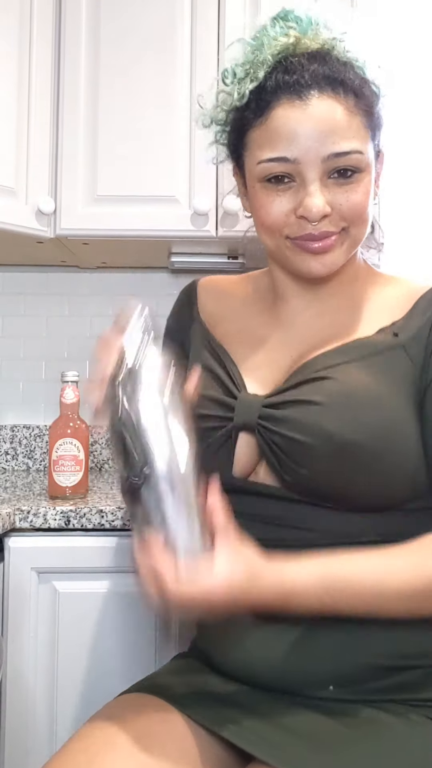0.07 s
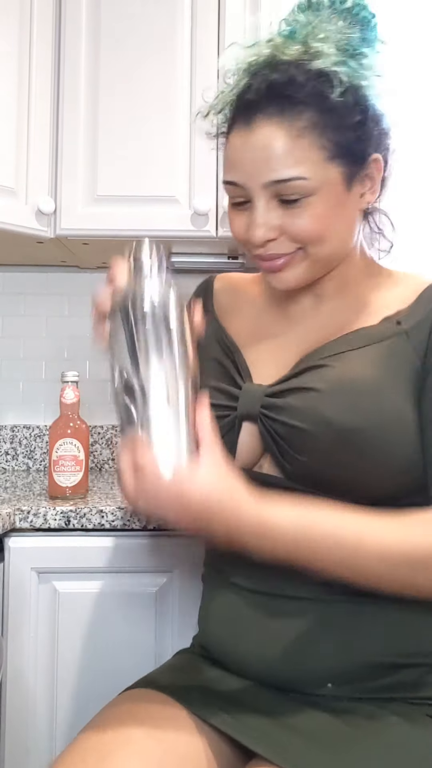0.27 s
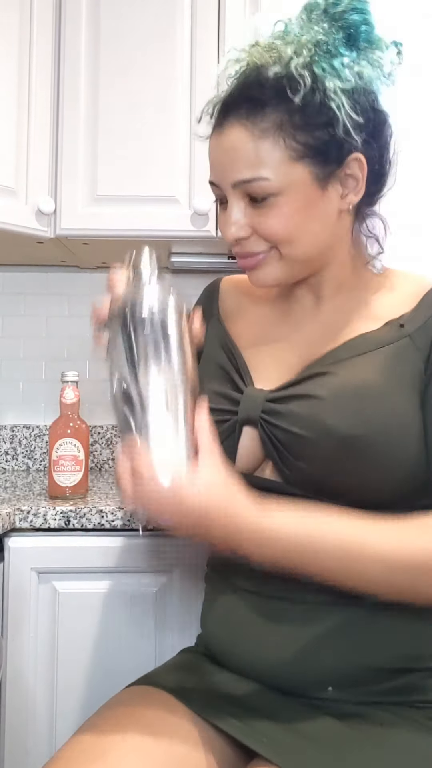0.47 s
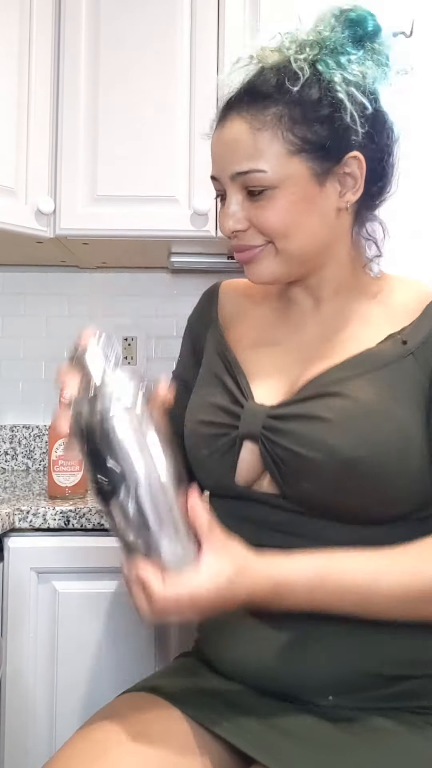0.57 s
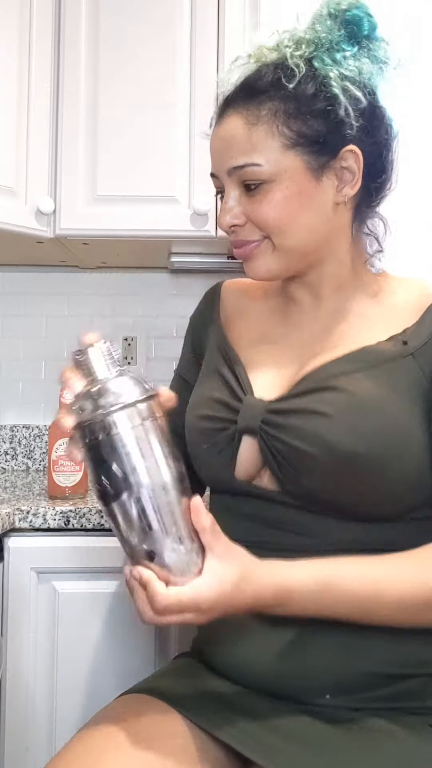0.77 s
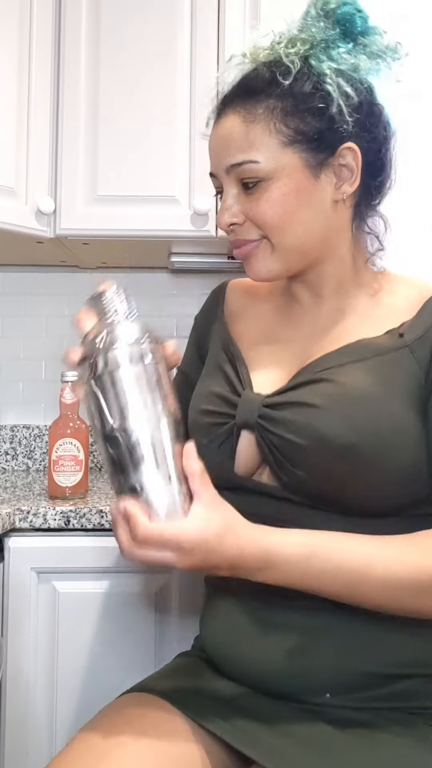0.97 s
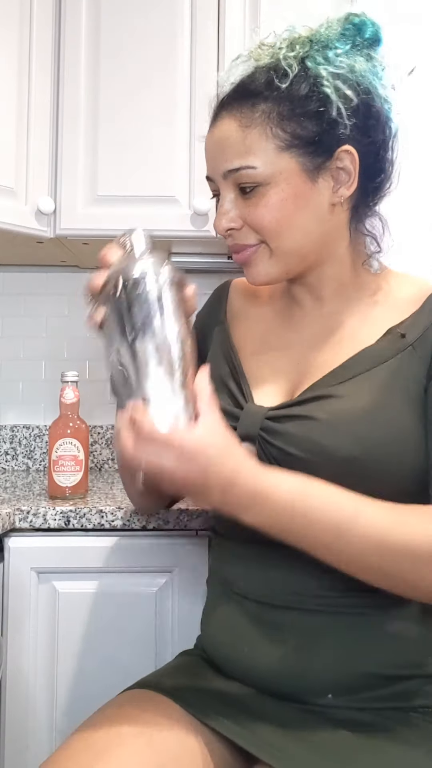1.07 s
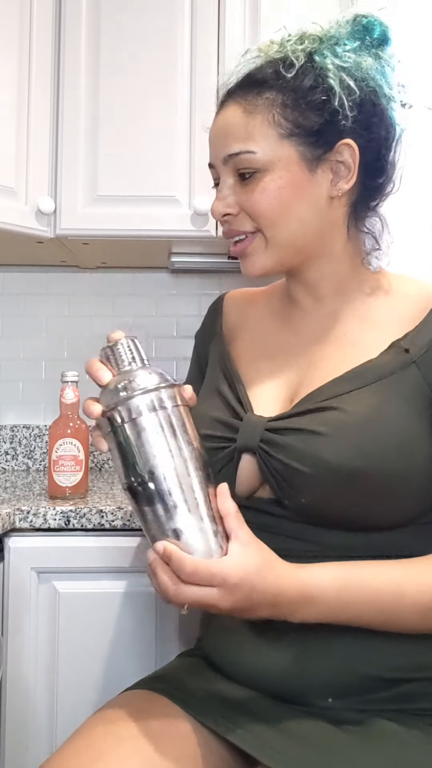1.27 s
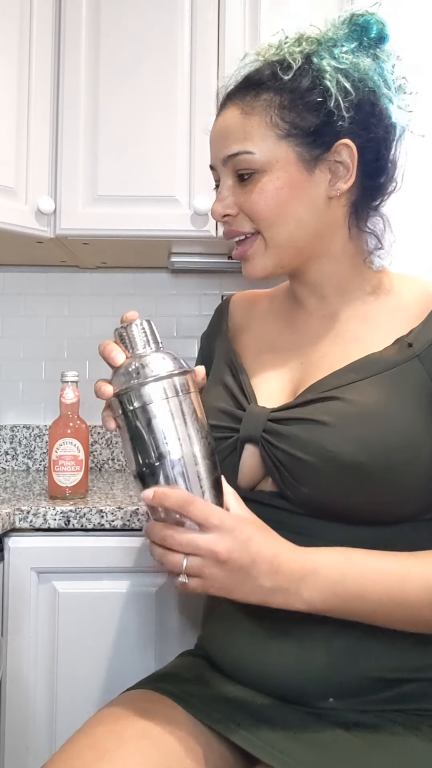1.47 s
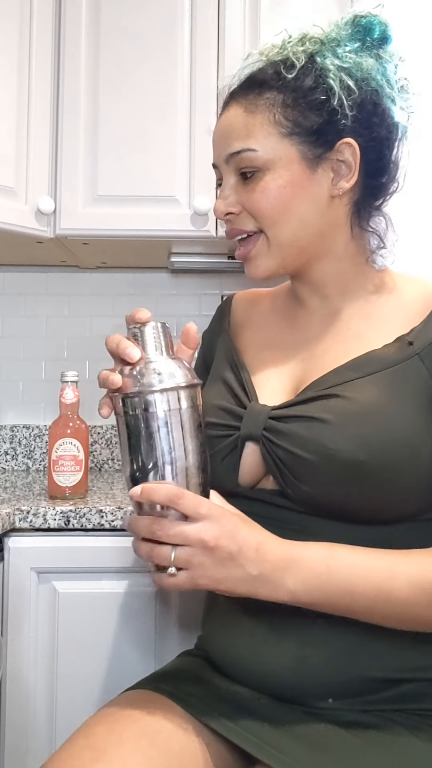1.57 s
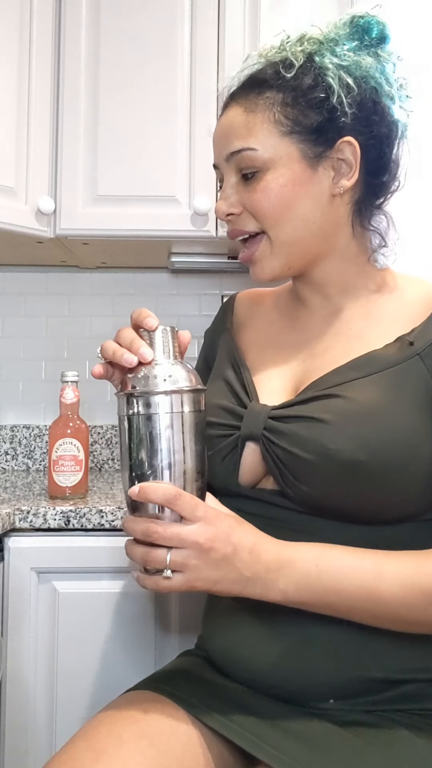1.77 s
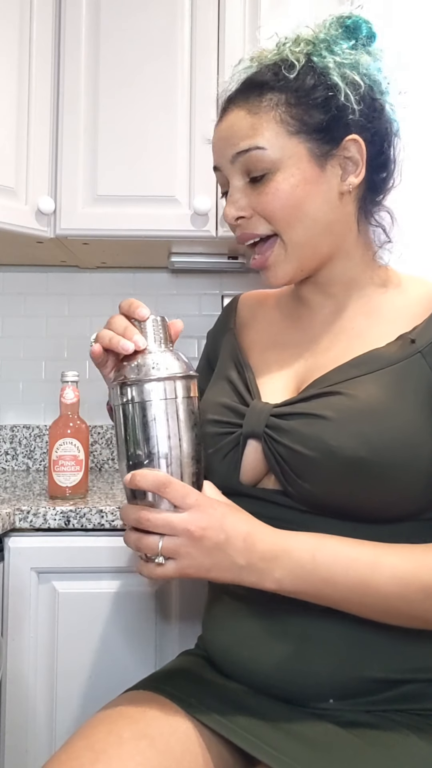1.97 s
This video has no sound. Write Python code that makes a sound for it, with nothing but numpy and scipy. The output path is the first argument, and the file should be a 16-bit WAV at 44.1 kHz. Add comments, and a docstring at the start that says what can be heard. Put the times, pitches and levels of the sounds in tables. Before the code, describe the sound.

Ice crashes end to end in a hand-held steel cocktail shaker, quick and even, with liquid sloshing; after about a second and a half it stops, and a few cubes clink faintly. Close stereo microphone, hard-walled kitchen.

```python
"""A hard-walled kitchen: ice cubes crash from end to end of a hand-held steel shaker, in stereo.
Crashes overlap for a second and a half; then the shaking stops, the room dies away, a few cubes settle.
Each crash is a spray of random clicks that rings the damped shell modes and drives broad clatter;
bursts of noise make the bright crackle, low noise the slosh of the drink. Lone knocks ring the modes.
Soft thumps of the load, noise-tail echoes, room air and a lumpy rumble lie below."""
import sys
import numpy as np
from scipy import signal
from scipy.fft import rfft, irfft
from scipy.io import wavfile

SR = 44100
rng = np.random.default_rng(int(sys.argv[2]) if len(sys.argv) > 2 else 0)


def volts(x):
    """Linear amplitude factor 10**(x/20) for a level x in dB, scalar or array-like."""
    e = np.asarray(x, float) / 20
    return 10 ** e


def bounce(signal):
    """Save signal as a 16-bit WAV file at the path given by the first command-line argument."""
    frames = np.transpose(np.atleast_2d(signal))
    limited = np.clip(frames, -1, 1)
    pcm = np.round(limited * 32767).astype(np.int16)
    wavfile.write(sys.argv[1], SR, pcm)


N = 89170


def rms_one(x):
    """Scale to rms 1."""
    return x / np.sqrt(np.mean(x ** 2) + 1e-20)


def at_hz(points, hz):
    """Read a table on a log-frequency axis."""
    table_hz, values = np.transpose(points)
    return np.interp(np.log(hz + 1), np.log(table_hz + 1), values)


def colour(x, spectrum):
    """Minimum-phase (causal) filter with this spectrum, power gain 1."""
    size = 4096
    level_db = np.maximum(at_hz(spectrum, np.fft.rfftfreq(size, 1 / SR)), -90)
    cepstrum = irfft(np.log(volts(level_db)))
    cepstrum[1:size // 2] *= 2  # fold onto positive time
    cepstrum[size // 2 + 1:] = 0
    pulse = irfft(np.exp(rfft(cepstrum)))
    pulse = pulse / np.sqrt(np.sum(pulse ** 2))
    return signal.fftconvolve(x, [pulse], axes=1)[:, :N]


def band_pass(x, low_hz, high_hz):
    """Butterworth band."""
    sos = signal.butter(2, [low_hz, high_hz], "band", fs=SR, output="sos")
    return signal.sosfilt(sos, x)


def ring(clicks, hz, t60_s):
    """Two-pole resonator: a unit click starts a decaying sine of height 1."""
    r, w = volts(-60 / (t60_s * SR)), 2 * np.pi * hz / SR
    return signal.lfilter([0, np.sin(w)], [1, -2 * r * np.cos(w), r * r], clicks + 1e-18)


def dying(clicks, t60_s):
    """Each click leaves a tail that falls 60 dB in t60_s."""
    return signal.lfilter([1], [1, -volts(-60 / (t60_s * SR))], clicks + 1e-18)


def drift(rate_hz):
    """Slow random wander, rms 1: noise through a double pole at rate_hz."""
    r = np.exp(-2 * np.pi * rate_hz / SR)
    wander = signal.lfilter([1], [1, -2 * r, r * r], rng.standard_normal(N + SR))
    return rms_one(wander[SR:])


def swell(start_s, rise_s, hold_s, level_db, release_db_per_s):
    """Power of one event: linear amplitude rise, hold, steady fall in dB."""
    t, rise_s = np.arange(N) / SR, max(rise_s, 1 / 1000)
    rise = np.clip((t - start_s) / rise_s, 0, 1)
    fall_db = release_db_per_s * np.maximum(t - start_s - rise_s - hold_s, 0)
    return (rise * volts(level_db - fall_db)) ** 2


def collisions(per_s, spread_db):
    """Random clicks at times shared by two channels, with uneven size and sign drawn for each; rms 1."""
    happens = rng.random(N) < per_s / SR
    sizes = happens * volts(spread_db * np.minimum(rng.exponential(1, N), 4))
    return rms_one(sizes * rng.standard_normal((2, N)))


# quiet of the room: [f/Hz, relative level/dB]
AIR_SPECTRUM = [(35, -38), (60, 8.5), (176, -5), (300, -14.5), (839, -5.5), (1060, -16), (1900, -15),
                (2240, -19.5), (15900, -27)]
AIR_DB = -65.5


def room_air():
    """Faint steady coloured noise."""
    return volts(AIR_DB) * colour(rng.standard_normal((2, N)), AIR_SPECTRUM)


# low rumble: [t/s, level/dB]
RUMBLE_LEVEL = [(0.0, -49), (0.03, -57), (0.1, -61), (0.71, -53), (1.5, -70.5), (1.59, -52), (1.66, -67),
                (2.02, -64.5)]
RUMBLE_HZ, RUMBLE_WIDTH_HZ = 53, 33


def rumble():
    """Noise through two equal resonators, its level following the table."""
    r, w = np.exp(-np.pi * RUMBLE_WIDTH_HZ / SR), 2 * np.pi * RUMBLE_HZ / SR
    low = rng.standard_normal((2, N + SR))
    for _ in range(2):
        low = signal.lfilter([1, 0, -1], [1, -2 * r * np.cos(w), r * r], low)
    t_s, level_db = np.transpose(RUMBLE_LEVEL)
    return volts(np.interp(np.arange(N) / SR, t_s, level_db)) * rms_one(low[:, SR:])


# decay of the room: [f/Hz, t60/s]
KITCHEN_DECAY = [(100, 0.95), (500, .55), (2000, 0.58), (5000, 0.53), (9000, 0.43), (14000, 0.44)]
FIRST_ECHO_S = 0.0038


def kitchen(pair):
    """Dense echoes as dying noise, octave by octave; the bass lasts longest."""
    t = np.arange(int(0.8 * SR)) / SR
    white = rng.standard_normal((2, len(t)))
    edges_hz = 60 * 2. ** np.arange(9) * 1.3
    tail = 0
    for low, high in zip(edges_hz, edges_hz[1:]):
        t60_s = at_hz(KITCHEN_DECAY, np.sqrt(low * high))
        tail = tail + band_pass(white, low, high) * volts(-60 * t / t60_s)
    tail = tail * np.clip(t / FIRST_ECHO_S - 1, 0, 1)
    tail = tail / np.sqrt(np.mean(np.sum(tail ** 2, axis=1)))
    return signal.fftconvolve(pair, tail, axes=1)[:, :N]


# thuds of the whole load: [t/s, level/dB]
LOAD_THUMPS = [(0.069, -51), (0.21, -44.5), (0.403, -49), (0.655, -48), (0.739, -54.5), (0.865, -48.5),
               (1.112, -42), (1.406, -59)]
THUMP_HZ, THUMP_S = 97, 0.069


def thumps():
    """Soft low push of the whole load: a windowed sine, mostly shared by both channels."""
    clicks = np.zeros(N)
    start_s, level_db = np.transpose(LOAD_THUMPS)
    clicks[(start_s * SR).astype(int)] = volts(level_db)
    t = np.arange(int(THUMP_S * SR)) / SR
    push = np.hanning(len(t)) * np.sin(2 * np.pi * THUMP_HZ * t)
    return np.convolve(clicks, push)[:N] * [[1], [0.2]]


# the drink is thrown against an end: [t/s, level/dB]
DRINK_SPLASHES = [(0.0, -25.5), (0.063, -22.5), (0.185, -26), (0.265, -22.5), (0.4, -29), (0.5, -24),
                  (0.637, -28.5), (0.707, -21), (0.845, -25), (0.944, -24.5), (1.064, -30), (1.14, -27.5),
                  (1.164, -30.5), (1.34, -41.5), (1.39, -24.5), (1.449, -32), (1.519, -42), (1.688, -50.5),
                  (1.824, -54)]
SPLASH_RISE_S, SPLASH_HOLD_S, SPLASH_DB_PER_S = 0.003, 0.027, 305.5
# sound of the drink: [f/Hz, relative level/dB]
SLOSH_SPECTRUM = [(76, -32), (130, -18), (230, -8), (387, -8.5), (492, -4.5), (638, -3), (1100, -2),
                  (1430, -11), (2420, -120)]
SLOSH_DB, SLOSH_PATCHY_DB, SLOSH_PATCHY_HZ = -9, 0.5, 8.2


def slosh():
    """Patchy low noise that swells with every splash."""
    power = sum(swell(start_s, SPLASH_RISE_S, SPLASH_HOLD_S, level_db, SPLASH_DB_PER_S)
                for start_s, level_db in DRINK_SPLASHES)
    patches = volts(SLOSH_DB + SLOSH_PATCHY_DB * drift(SLOSH_PATCHY_HZ))
    return colour(patches * np.sqrt(power) * rng.standard_normal((2, N)), SLOSH_SPECTRUM)


# the load of ice lands: [t/s, rise/s, hold/s, level/dB, crackle over shell/dB]
ICE_CRASHES = [(0.0, 0.0013, 0.014, -22.5, 1), (0.036, .002, 0.041, -21.5, 0.5),
               (0.05, 0.0078, 0.043, -20.5, 0), (0.167, .01, 0.0018, -30, 7),
               (0.184, .0015, 0.019, -21.5, 5), (0.221, .01, 0.054, -21, 2),
               (0.274, 0.015, 0.019, -18, -1.5), (0.382, 0.018, 0.026, -24, 6.5),
               (0.408, 0.0092, 0.035, -21.5, 2.5), (0.478, 0.0086, .01, -19.5, -2.5),
               (0.504, 0.0023, 0.025, -17, 2), (0.633, .003, 0.038, -25, 3),
               (0.674, 0.022, 0.031, -17.5, 2), (0.806, .005, 0.0064, -27.5, 0),
               (0.842, .0015, 0.046, -21.5, 4), (0.908, 0.0071, 0.012, -19.5, -0.5),
               (0.933, 0.008, 0.021, -19, 1.5), (1.057, 0.0087, 0.025, -26.5, -0.5),
               (1.1324, 0.0018, 0.051, -17.5, -4.5), (1.156, 0.012, 0.019, -19.5, 3.5),
               (1.335, 0.0016, 0.0055, -31, -1), (1.362, 0.003, 0.0097, -26, -6),
               (1.391, 0.0012, 0.013, -23, -5.5), (1.407, 0.0088, 0.03, -26.5, -0.5),
               (1.533, 0.0036, 0.034, -47, -3.5), (1.802, .001, .003, -59, 2.5),
               (1.825, .003, 0.045, -62, -8.5), (1.968, .003, .015, -77.5, 10.5)]
RELEASE_DB_PER_S = 217.5


def agitation():
    """Crash envelopes summed in power: overall and for the crackle."""
    powers = np.array([swell(*row[:4], RELEASE_DB_PER_S) for row in ICE_CRASHES])
    crackle_db = np.array(ICE_CRASHES)[:, 4]
    return np.sqrt(powers.sum(0)), np.sqrt(volts(2 * crackle_db) @ powers)


# ice on ice: [f/Hz, relative level/dB]
CRACKLE_SPECTRUM = [(2350, -10), (4000, 0), (4840, -7.5), (5400, -6.5), (9730, -3), (10800, -10),
                    (11600, -7.5), (14100, -10.5), (15900, -17.5)]
CRACKLE_DB, CHIPS_PER_S, CHIP_SPREAD_DB, CHIP_T60_S = -4, 5000, 0, 0.011
SNAP_DB, SNAP_T60_S = -20, 0.011
TINT_DB, TINT_HZ = 2, 9


def crackle(bright):
    """Fine ice contacts and knock snaps: tiny dying noise bursts in bands of wandering level."""
    snaps = np.zeros(N)
    start_s, level_db = np.array(CUBE_KNOCKS)[:, :2].T
    snaps[(start_s * SR).astype(int)] = volts(level_db + SNAP_DB)
    contacts = np.abs(collisions(CHIPS_PER_S, CHIP_SPREAD_DB)[0])
    chips = rms_one(dying(contacts, CHIP_T60_S))
    level = volts(CRACKLE_DB) * bright * chips + dying(snaps, SNAP_T60_S)
    hiss = level * rng.standard_normal((2, N))
    sources = [hiss, hiss * rng.choice([-1, 1], (2, N))]  # neighbouring bands differ
    edges_hz = np.geomspace(2000, 19000, 7)
    out = 0
    for k, (low, high) in enumerate(zip(edges_hz, edges_hz[1:])):
        tint = volts(TINT_DB * np.tanh(drift(TINT_HZ)))
        out = out + tint * band_pass(sources[k % 2], low, high)
    return colour(out, CRACKLE_SPECTRUM)


# cubes on steel, the short broad part: [f/Hz, relative level/dB]
CLATTER_SPECTRUM = [(410, -43), (700, -18.5), (1220, -8.5), (1930, -3), (2510, -2), (2830, -6),
                    (5000, -11.5), (6500, -8.5), (11000, -120)]
CLATTER_DB = -2.5
COLLISIONS_PER_S, SIZE_SPREAD_DB = 2500, 1.5


def clatter(body):
    """Cubes on steel: coloured random clicks under the crash envelope."""
    clicks = body * collisions(COLLISIONS_PER_S, SIZE_SPREAD_DB)
    return volts(CLATTER_DB) * colour(clicks, CLATTER_SPECTRUM)


# single cubes hit the wall: [t/s, relative level/dB, pitch f/Hz, second pitch f/Hz, share of full ring time]
CUBE_KNOCKS = [(0.0394, -18, 1890, 3360, 0.3), (0.062, -15, 2350, 3940, 0.3),
               (0.1868, -12, 1550, 3700, 0.16), (0.1896, -7, 1620, 3150, 0.26),
               (0.2082, -6, 1630, 3160, 0.25), (0.255, -26, 1910, 3670, 0.24),
               (0.2909, 2, 2220, 2765, 0.32), (0.2985, -3, 2480, 3310, 0.24),
               (0.3254, -25, 1660, 2830, 0.3), (0.3644, -8, 2300, 3220, 0.2), (0.396, -16, 1620, 2800, 0.3),
               (0.4197, -8.5, 1880, 3600, 0.43), (0.4959, -7, 1940, 3310, 0.21),
               (0.5052, 0, 1680, 3930, 0.36), (0.5111, -1.5, 2550, 4000, 0.28),
               (0.5168, -2.5, 2560, 3870, 0.27), (0.525, -3, 2530, 2850, 0.3),
               (0.6392, -5, 1940, 2810, 0.32), (0.6903, -8, 1870, 3500, 0.23),
               (0.7098, -3.5, 2650, 3910, 0.28), (0.8458, -6.5, 1890, 3110, 0.38),
               (0.9205, 0, 1660, 3170, 0.31), (0.9398, -5, 1390, 3750, 0.35),
               (0.9461, -3, 2050, 2860, 0.31), (0.9547, -1.5, 2090, 2860, 0.39),
               (0.9744, -12.5, 2200, 3330, 0.3), (1.1378, -9.5, 2520, 3450, 0.23),
               (1.1661, -11.5, 1680, 2980, 0.28), (1.1789, -8.5, 2370, 3300, 0.3),
               (1.21, -9.5, 2350, 3850, 0.32), (1.3394, -22, 1690, 3610, 0.37),
               (1.3475, -22.5, 1890, 2970, 0.39), (1.3614, -21.5, 1940, 3950, 0.3),
               (1.3944, -13.5, 1670, 3730, 0.27), (1.4017, -6, 1650, 3680, 0.39),
               (1.547, -38, 1690, 3320, 0.3), (1.8048, -46, 2450, 4020, 0.26),
               (1.8233, -46.5, 1880, 3750, 0.26), (1.845, -31.5, 1690, 2860, 0.28),
               (2.0134, -30, 1930, 3720, 0.29), (0.8604, -9, 1960, 3130, 0.78),
               (1.0714, -4.5, 1910, 3000, 0.7), (1.1474, -7.5, 2300, 2920, 0.7),
               (2.0134, -36, 3800, 794, 0.33)]
KNOCK_DB, KNOCK_OCTAVES, SECOND_DB, CONTACT_S = -5.5, 0.043, -5.5, 0.0058


def knocks():
    """Lone hits ring the modes near two pitches; longer rings are purer and start softer."""
    out, t = np.zeros((2, N + SR)), np.arange(int(0.15 * SR)) / SR
    hz, mode_db, t60_s = np.transpose(SHELL_MODES)[:, :, None]
    signs = rng.choice([-1, 1], (len(CUBE_KNOCKS), len(SHELL_MODES)))
    for (start_s, level_db, pitch, second, share), side in zip(CUBE_KNOCKS, signs):
        share = np.clip(share, 0.1, 0.8)
        near = 0
        for gain, p in [(1, pitch), (volts(SECOND_DB), second)]:
            near = near + gain * np.exp(-0.5 * (np.log2(hz / p) * share / KNOCK_OCTAVES) ** 2)
        decay = volts(mode_db - 60 * t / (t60_s * share))
        onset = np.minimum(t / (CONTACT_S * share ** 2), 1)
        rings = near * decay * np.sin(2 * np.pi * hz * t) * onset
        rings = rings / np.sqrt(np.sum((near * volts(mode_db)) ** 2))
        i = int(start_s * SR)
        out[:, i:i + len(t)] += volts(level_db + KNOCK_DB) * np.array([rings.sum(0), side @ rings])
    return out[:, :N]


# steel shell damped by hands and drink: [f/Hz, relative level/dB, t60/s]
SHELL_MODES = [(862, -8, .04), (1360, -5, 0.032), (1661, 3, 0.053), (1725, -10, 0.02), (1890, -0.5, 0.083),
               (2070, -0.5, 0.035), (2270, -4.5, 0.068), (2326, 0.5, 0.06), (2522, 2.5, 0.091),
               (2675, -0.5, 0.043), (2860, -6, 0.068), (3112, -2, 0.083), (3435, -4, 0.029),
               (4150, -18, .04)]
SHELL_DB, SHELL_CUT_HZ = -8, 520
GRIP_DB, GRIP_HZ = 6.5, 11  # grip and drink shift the favoured modes


def shell(body):
    """Every collision strikes every mode with its own sign; the mode levels wander."""
    hits = np.abs(collisions(COLLISIONS_PER_S, SIZE_SPREAD_DB))
    out, power = 0, 0
    for hz, mode_db, t60_s in SHELL_MODES:
        level = volts(mode_db + GRIP_DB * np.tanh(drift(GRIP_HZ)))
        strikes = level * body * hits * rng.choice([-1, 1], (2, N))
        out = out + ring(strikes, hz, t60_s)
        power += volts(2 * mode_db) * t60_s * SR / (4 * np.log(1000))
    return out / np.sqrt(power)


# stereo likeness: [f/Hz, left-right correlation]
EAR_LIKENESS = [(60, 0.79), (130, 0.44), (290, 0.41), (640, 1), (1410, 0.31), (3100, 0.033), (6820, 0.031),
                (15000, -0.11)]
# stereo lean: [f/Hz, left over right/dB]
EAR_LEAN = [(60, 0), (180, 0.0), (550, 0.5), (1650, 1.5), (4970, -0.5), (15000, 1.5)]


def two_ears(pair):
    """Shared and differing signals become left and right, alike and leaning by frequency."""
    hz = np.fft.rfftfreq(N, 1 / SR)
    alike, lean_db = np.clip(at_hz(EAR_LIKENESS, hz), -1, 1), at_hz(EAR_LEAN, hz)
    mid, side = rfft(pair) * np.sqrt([1 + alike, 1 - alike])
    left = (mid + side) * volts(lean_db / 2)
    right = (mid - side) * volts(-lean_db / 2)
    return irfft([left, right], N)


DIRECT_DB, KITCHEN_DB = -2.5, -8


def scene():
    """Shaker, direct and echoed, over thumps, air and rumble."""
    body, bright = agitation()
    high_pass = signal.butter(4, SHELL_CUT_HZ, "high", fs=SR, output="sos")
    steel = signal.sosfilt(high_pass, volts(SHELL_DB) * shell(body) + knocks())
    shaker = steel + clatter(body) + crackle(bright) + slosh()
    in_room = volts(DIRECT_DB) * shaker + volts(KITCHEN_DB) * kitchen(shaker)
    return two_ears(in_room + thumps() + rumble() + room_air())


def roll_off(x):
    """The treble ends steeply here."""
    return signal.sosfilt(signal.butter(12, 16050, fs=SR, output="sos"), x)


def record(dry):
    """Peaks stop at full scale."""
    mix = np.clip(dry, -1, 1)
    return roll_off(mix)


dry = scene()
out = record(dry)
bounce(out)
```